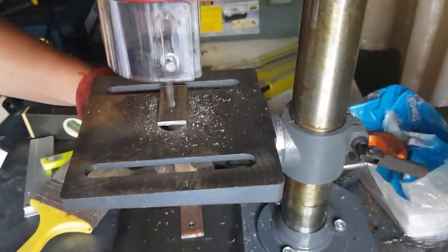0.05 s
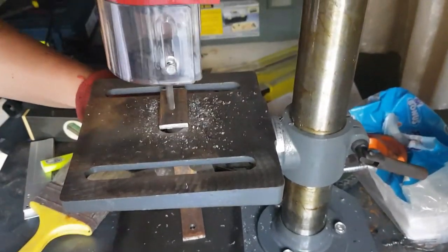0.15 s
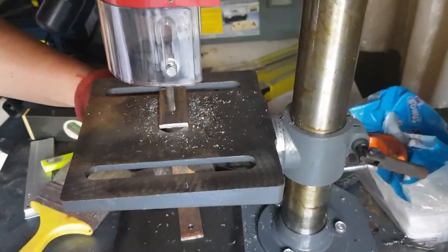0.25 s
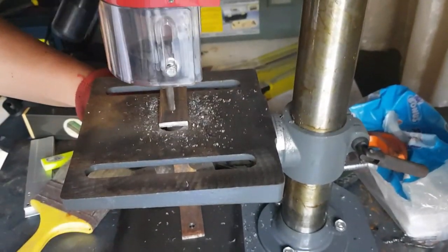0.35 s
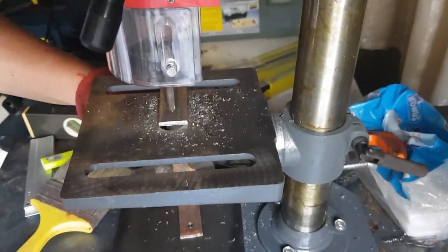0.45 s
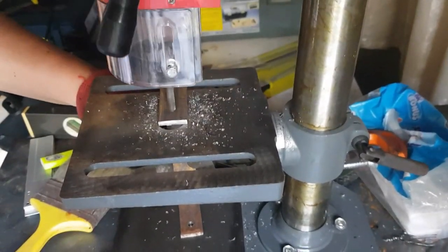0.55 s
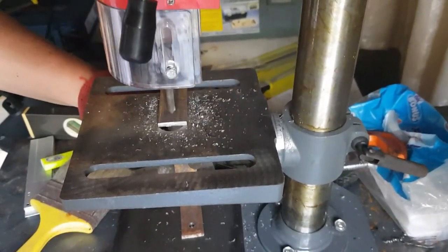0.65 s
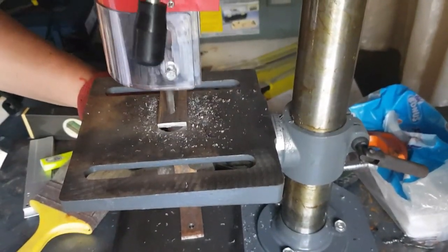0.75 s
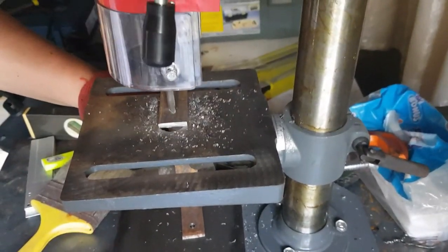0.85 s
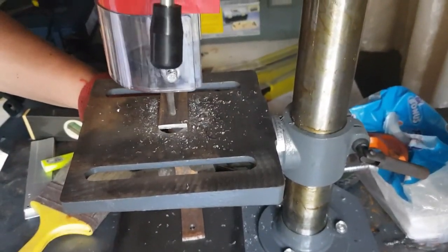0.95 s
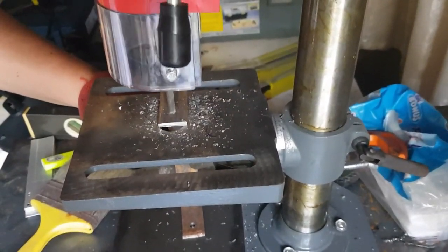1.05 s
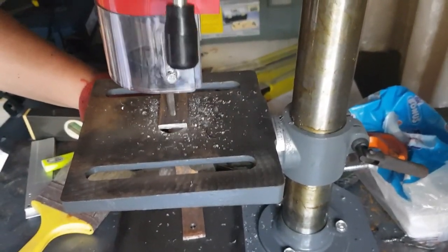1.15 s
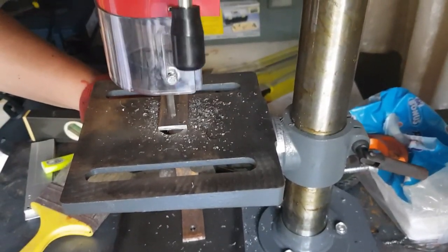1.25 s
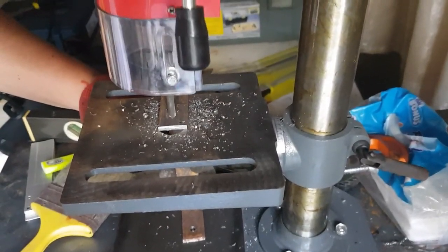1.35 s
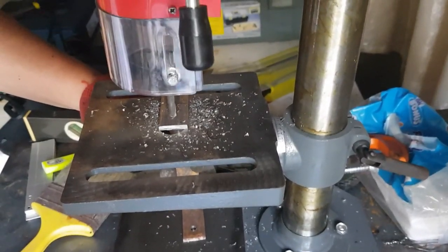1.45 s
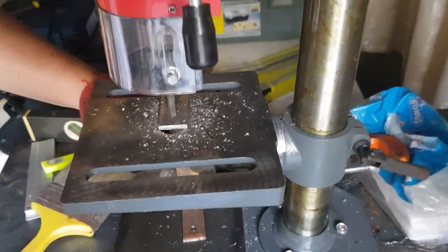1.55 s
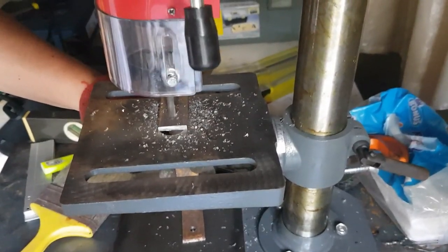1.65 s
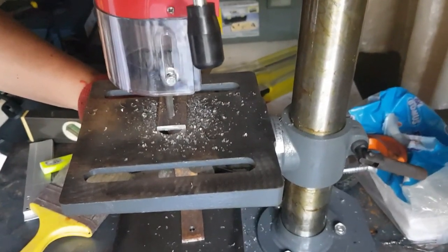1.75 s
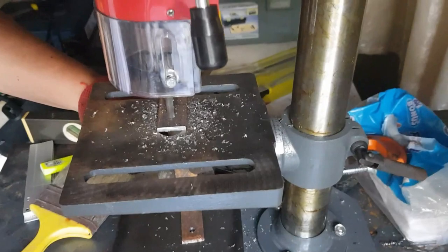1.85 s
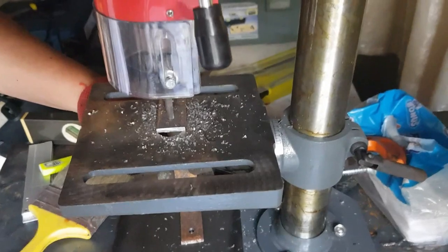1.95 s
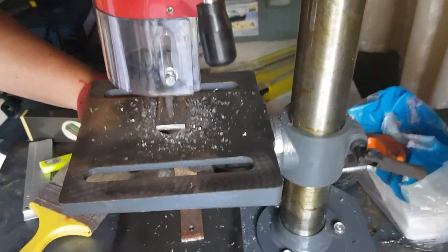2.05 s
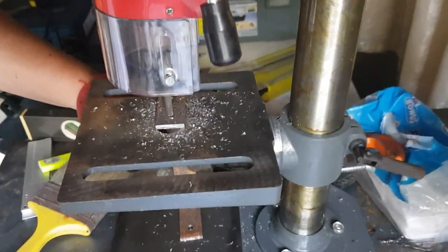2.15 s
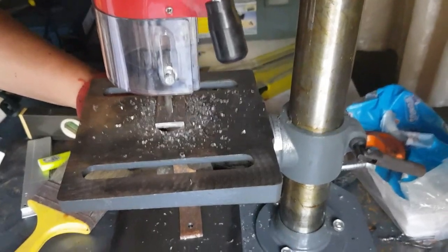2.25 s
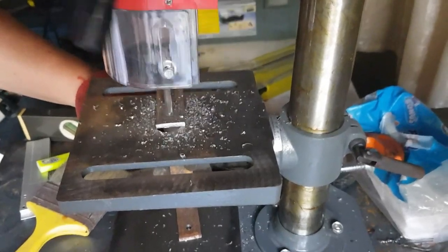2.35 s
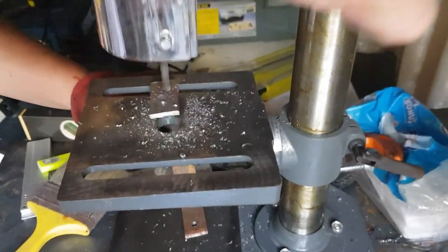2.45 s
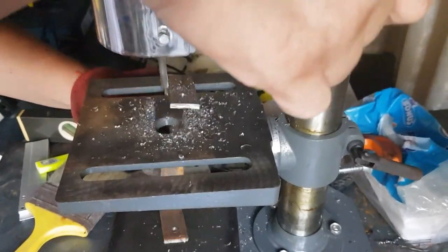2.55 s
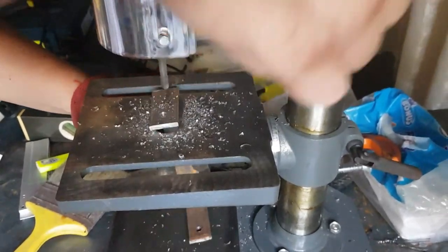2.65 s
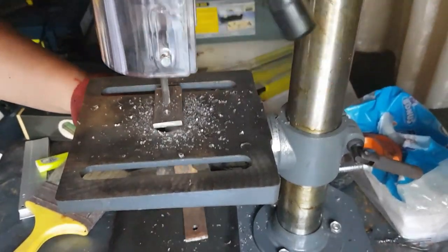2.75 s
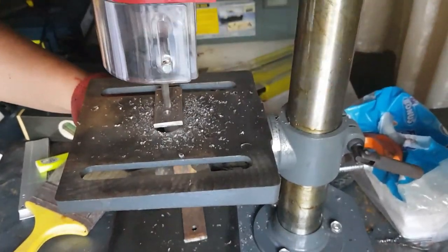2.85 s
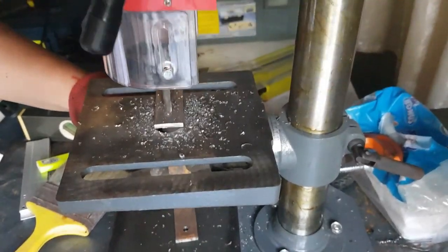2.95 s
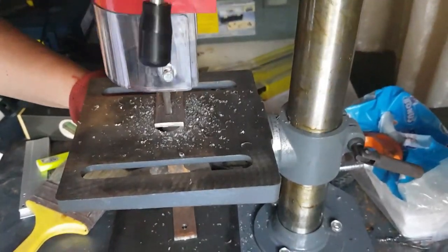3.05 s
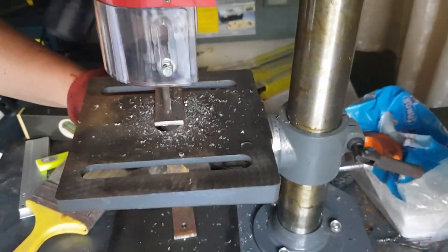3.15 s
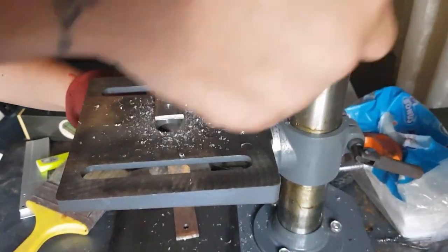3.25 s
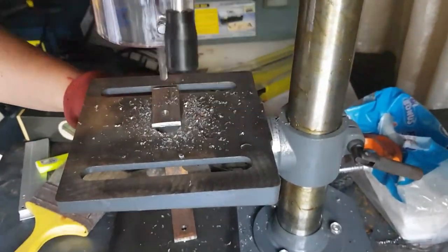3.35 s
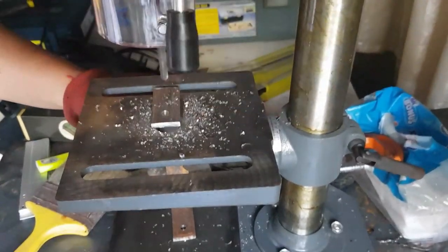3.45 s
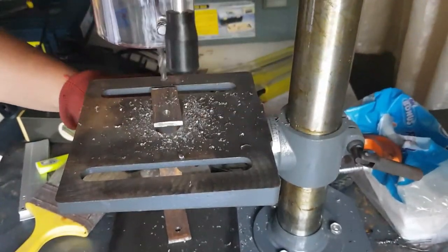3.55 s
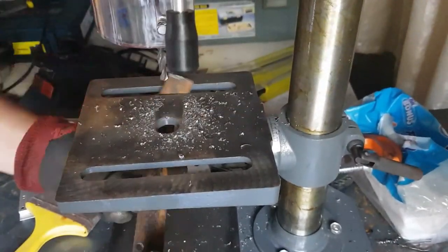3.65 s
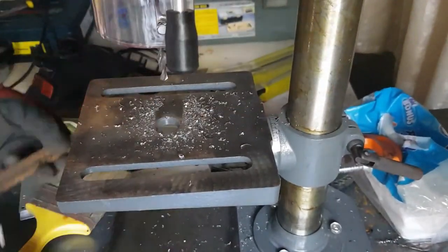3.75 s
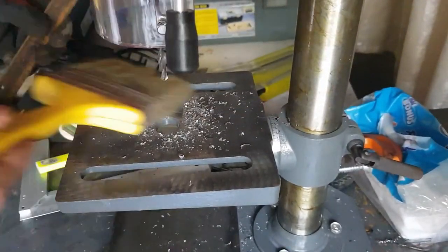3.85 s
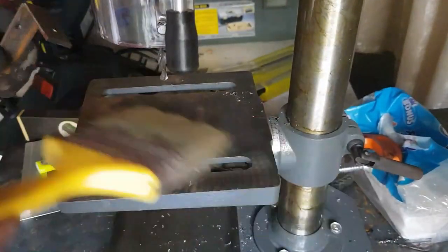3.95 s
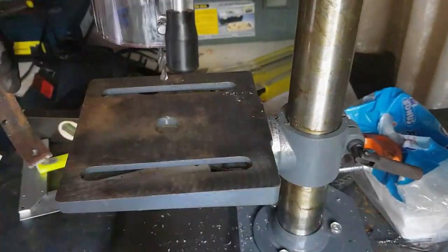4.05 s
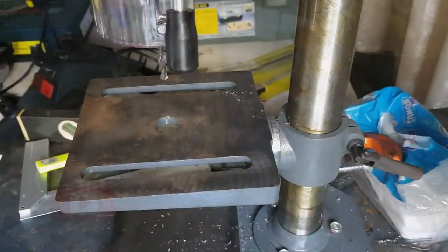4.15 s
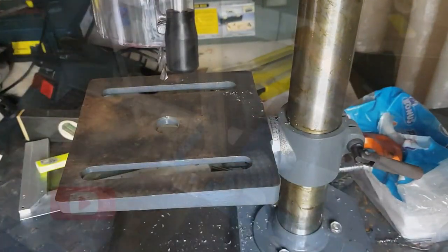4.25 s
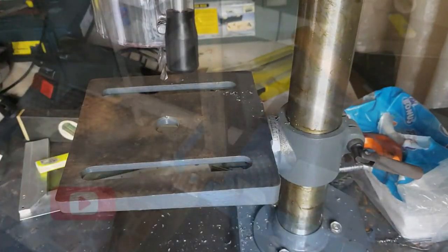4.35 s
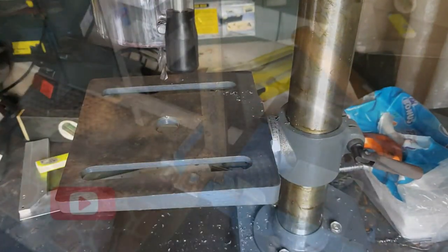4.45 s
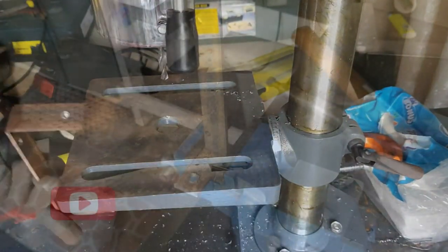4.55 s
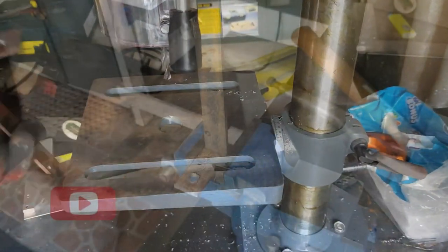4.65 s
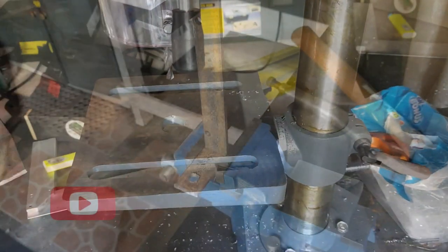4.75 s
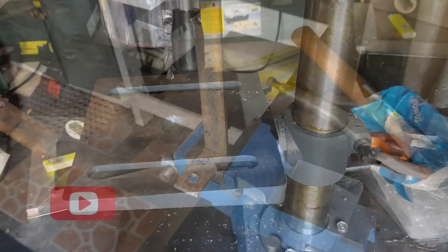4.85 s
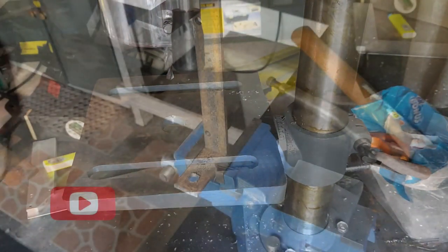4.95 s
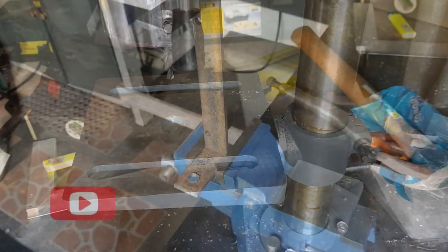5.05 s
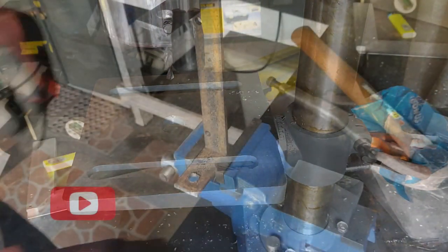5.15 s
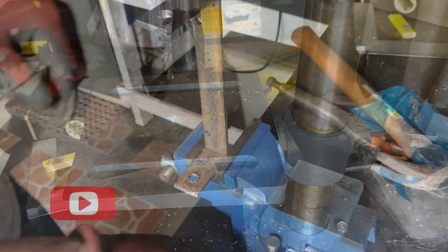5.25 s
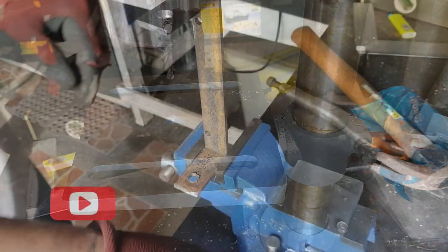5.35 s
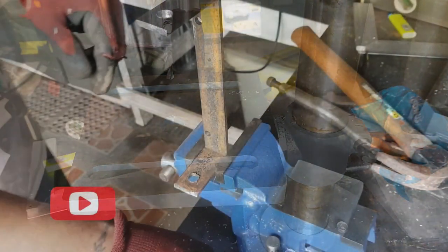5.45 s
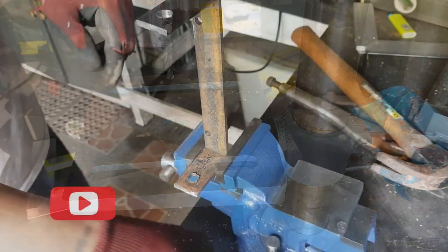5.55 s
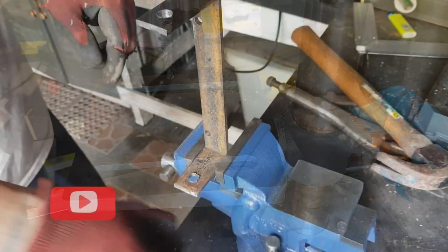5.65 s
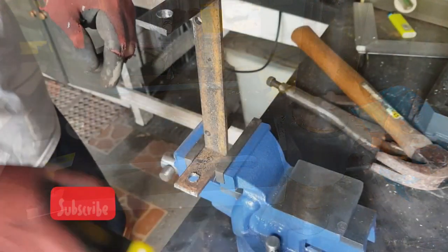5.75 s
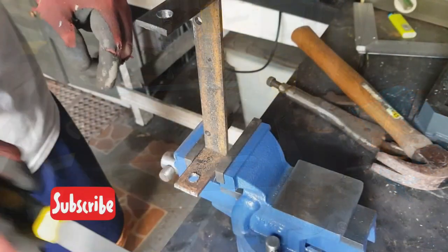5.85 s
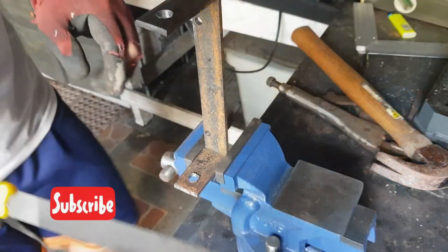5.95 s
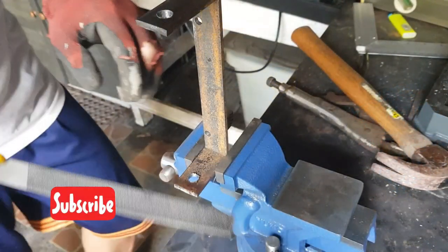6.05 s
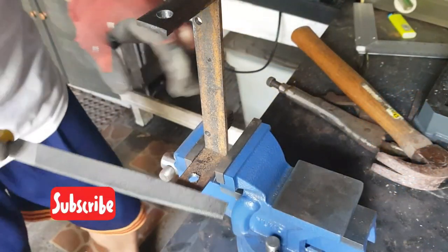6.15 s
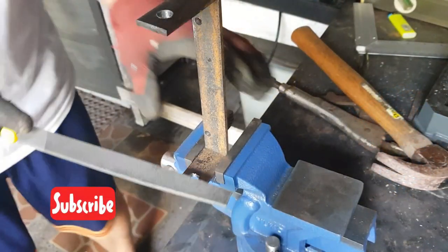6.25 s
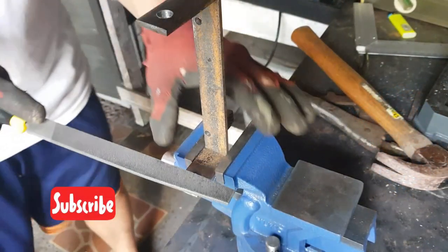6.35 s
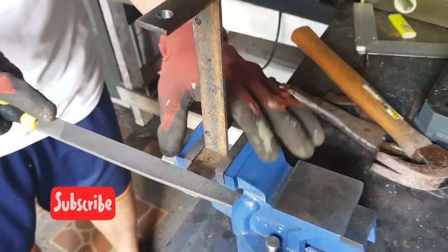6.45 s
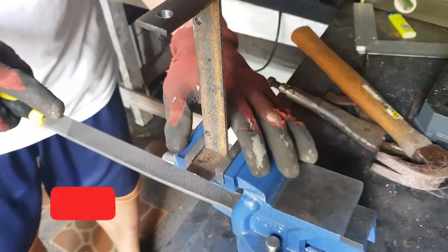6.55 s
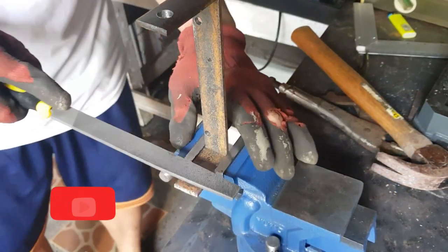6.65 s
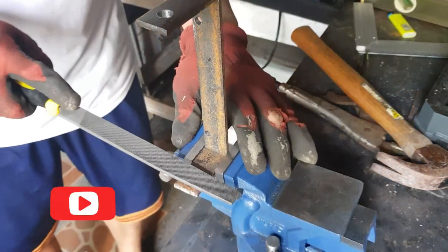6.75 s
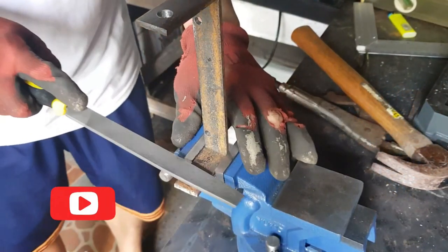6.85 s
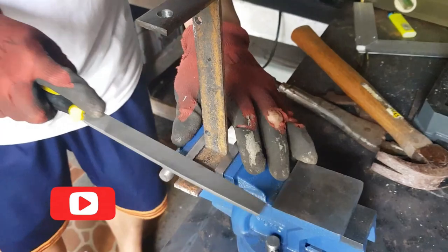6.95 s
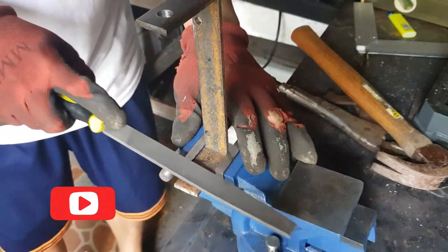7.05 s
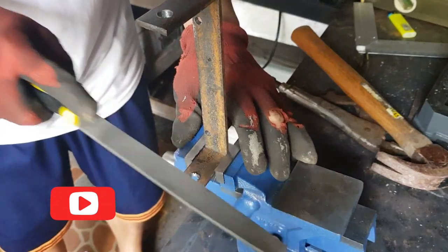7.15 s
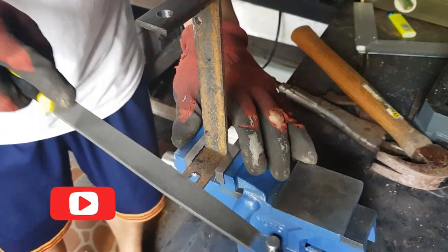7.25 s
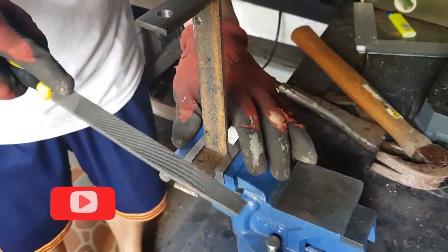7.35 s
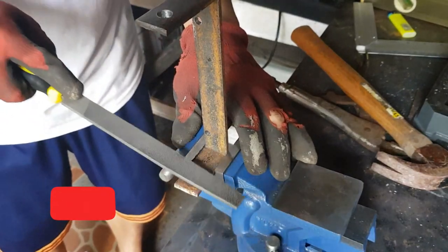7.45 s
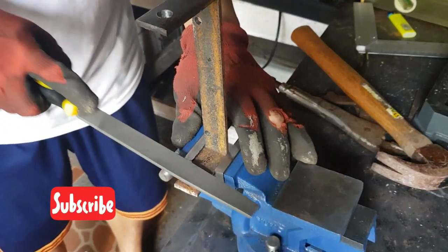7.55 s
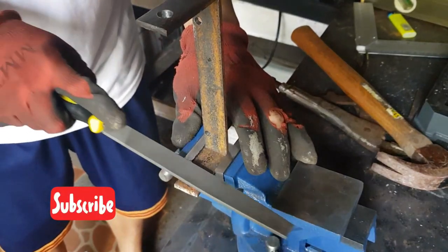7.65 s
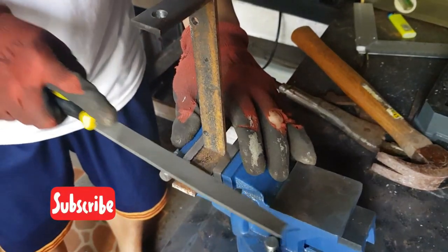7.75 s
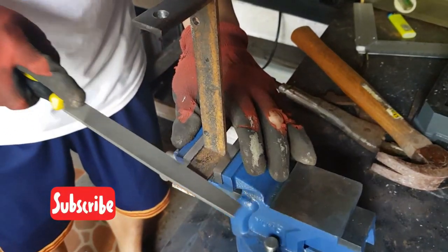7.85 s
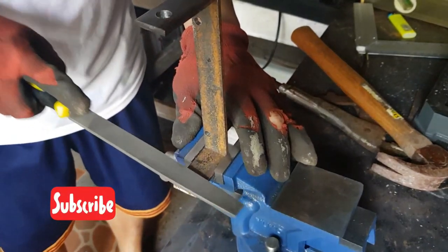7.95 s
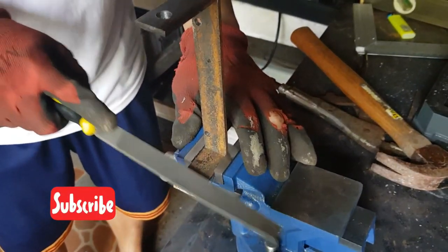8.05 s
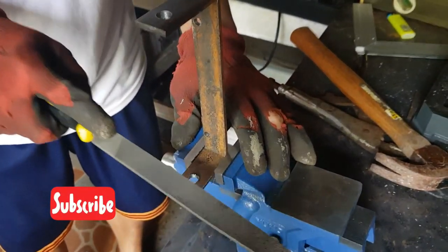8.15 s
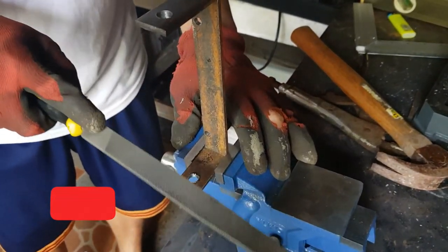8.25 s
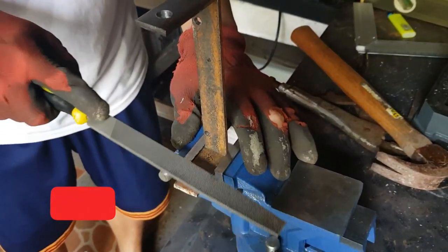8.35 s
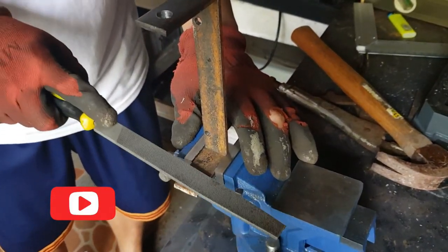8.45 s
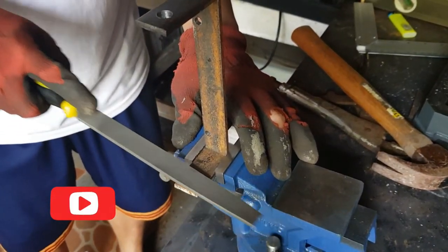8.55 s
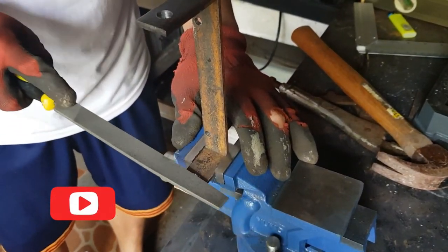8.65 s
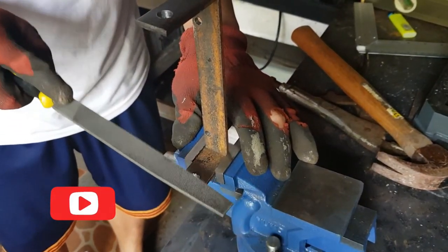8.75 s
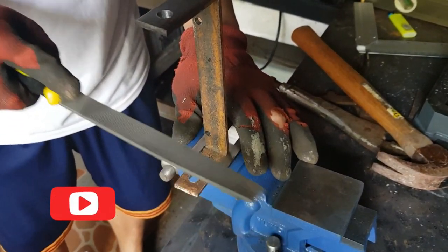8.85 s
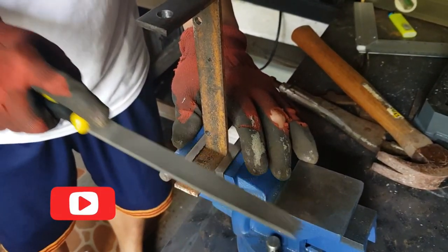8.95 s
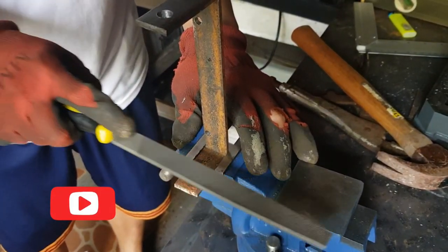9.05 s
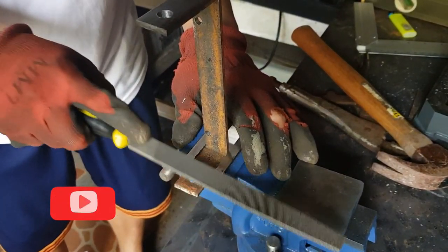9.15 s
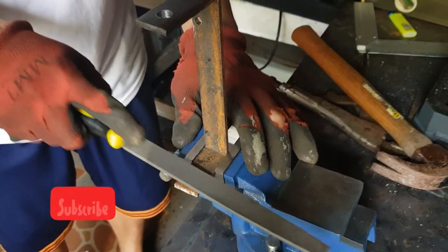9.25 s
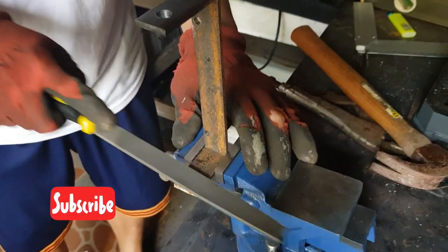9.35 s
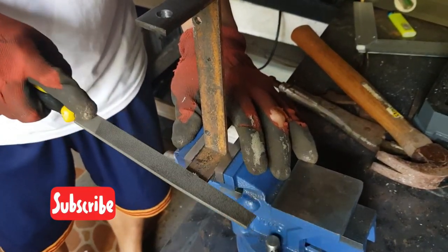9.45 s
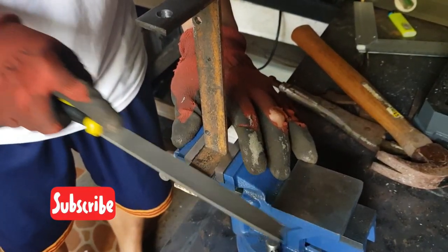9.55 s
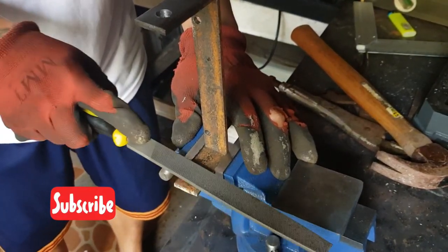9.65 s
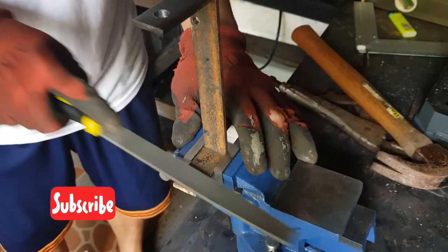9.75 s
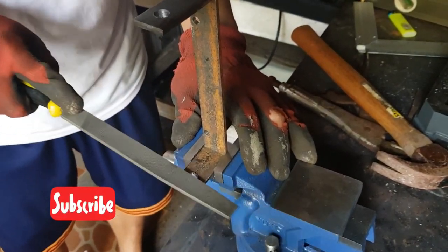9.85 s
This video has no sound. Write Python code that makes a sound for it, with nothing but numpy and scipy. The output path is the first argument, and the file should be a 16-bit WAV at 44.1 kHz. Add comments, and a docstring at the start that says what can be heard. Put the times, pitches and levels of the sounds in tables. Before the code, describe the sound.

A drill press rattles and squeals through a steel bar, then stops, followed by faint rustling and quick, ringing strokes of a metal file.

```python
"""Drilling and filing steel

A bench drill hums, rattles and squeals through a steel bar and screeches as it breaks through; then the scene
changes. The table is brushed clean and, after a blank moment, a gloved hand settles a bar in a vice. A flat
file is laid on and pushed in strokes: its teeth catch and let go, making blade, bar, vice and bench ring. All
is faster than life, so blows smear into bursts of grit. Behind are faint chirps and a low rumble."""
import sys
import numpy as np
from scipy import signal
from scipy.fft import rfft, irfft, next_fast_len
from scipy.io import wavfile
from scipy.ndimage import uniform_filter1d

SR = 44100
rng = np.random.default_rng(int(sys.argv[2]) if len(sys.argv) > 2 else 0)


def store_wav(level_fs):
    """Save 16-bit WAV to argv[1]."""
    pcm = np.round(np.clip(np.atleast_2d(level_fs), -1, 1) * 32767)
    wavfile.write(sys.argv[1], SR, pcm.T.astype(np.int16))


N = 436590
TIME = np.arange(N) / SR
SIZE = next_fast_len(N + SR // 2)
HZ = np.maximum(np.arange(SIZE // 2 + 1) * SR / SIZE, 1)   # the pitches in a spectrum

# The motor's hum ringing in its housing: time_s, level_db
HOUSING = [(0.0, -24), (0.06, -17.5), (0.7, -19), (1.17, -23), (1.18, -24.5), (2.0, -21.5), (2.03, -25),
           (2.21, -21), (2.3, -25.5), (2.51, -19.5), (2.58, -23.5), (2.67, -18.5), (3.3, -18), (3.33, -22),
           (3.45, -15.5), (3.55, -19)]
# A lower hum that groans as the bit bites: time_s, level_db
HUM = [(0.0, -45), (0.06, -34.5), (0.62, -38.5), (0.78, -33.5), (1.0, -38), (1.12, -22.5), (1.21, -20.5),
       (1.25, -31), (1.55, -39.5), (1.59, -29.5), (1.7, -37), (2.17, -29), (2.58, -41), (3.06, -33),
       (3.12, -46.5), (3.26, -32), (3.36, -52), (3.55, -43)]
def motor():
    """The motor's magnets make two trembling tones, a little louder on the right."""
    housing = amp(in_time(HOUSING)) * wavering(hz=480.5, wander_hz=2.5, flutter_db=1.5)
    hum = amp(in_time(HUM)) * wavering(hz=242.5, wander_hz=9, flutter_db=3.5)
    return housing * amp([[-2.8], [2.1]]) + hum * amp([[-1.2], [1.1]])


# The rattle's tone colour (how strong its lows and highs are): pitch_hz, level_db
RATTLE_COLOUR = [(15, -62.5), (25, -34.5), (86, -26), (160, -24), (400, -25.5), (568, -17.5), (850, -28),
                 (1000, -31), (1500, -25.5), (1810, -35), (2780, -35), (8620, -46), (12000, -43.5),
                 (15600, -43.5)]
# Notes at which the machine rings: pitch_hz, width_hz, boost_db
RATTLE_NOTES = [(81.6, 51, 4.5), (253, 23, 2.5), (475, 56, 2), (531, 37, 6.5), (840.3, 12, 15),
                (1080.7, 23, 14.5), (1305, 28, -3), (1927, 35, 10), (2840, 51, -5), (4100, 64, 4.5)]
def rattle():
    """Belt and spindle rattle, partly following the loudness of the housing. Gives a spectrum."""
    swing_db = in_time(HOUSING) - np.mean(np.array(HOUSING)[:, 1])
    force = amp(-43.5 + 0.34 * swing_db) * grit(1.6, 60)
    return sound(force, body(RATTLE_COLOUR, RATTLE_NOTES), 9500, 14940)


# How loudly the bit cuts: time_s, level_db
CUT = [(0.72, -55.5), (1.014, -35), (1.176, -31.5), (1.37, -31.5), (1.634, -27), (1.98, -27), (2.36, -29),
       (2.414, -25.5), (2.448, -48), (2.47, -61)]
# The tone colour of cutting: pitch_hz, level_db
CUT_COLOUR = [(410, -38), (700, -7.5), (847, 0), (2530, -10), (2780, -6.5), (3210, -13), (4580, -12),
              (5100, -11), (6090, -4), (12000, -23.5), (15600, -57), (22000, -120)]
# The bit's squealing notes: pitch_hz, width_hz, boost_db
BIT_NOTES = [(1222, 13, 9), (1657, 35, 11), (2117, 50, 11), (2390, 16, -2), (2740, 190, 10.5),
             (4250, 160, 10.5), (4320, 73, 1), (4620, 33, 19.5), (5540, 68, 2.5), (5937, 48, 13),
             (6140, 35, 4.5), (6700, 60, 10), (8030, 25, 8.5), (8220, 35, 13), (9540, 54, 7)]
# The tip's high notes: pitch_hz, width_hz, boost_db
TIP_NOTES = [(5000, 130, 3), (7200, 36, 4), (7500, 50, 8.5)]
# The tip squeals most as it first bites: time_s, boost_db
BITE = [(.8, 2), (.93, 12.5), (1.2, 10), (1.4, 2.5), (2.4, -3)]
def cutting():
    """The bit shears steel, which hisses and makes the bit and its tip squeal. Gives a spectrum."""
    shear = during(CUT) * amp(in_time(CUT)) * grit(1.6, 57)
    shear /= gain(body(CUT_COLOUR, BIT_NOTES), 2400, 8500)
    hiss = rfft(shear, SIZE) * amp(at_hz(CUT_COLOUR))
    squeal = rfft(shear * amp(2 + 0.94 * drift(3.5)), SIZE) * rings(CUT_COLOUR, BIT_NOTES)
    tip = rfft(shear * amp(in_time(BITE) + 2.1 * drift(19)), SIZE) * rings(CUT_COLOUR, TIP_NOTES)
    return hiss + squeal + tip


# The screech of breaking through: time_s, level_db
SCREECH = [(2.38, -59.5), (2.387, -27.5), (2.402, -23.5), (2.412, -17.5), (2.422, -25), (2.438, -42.5),
           (2.445, -69)]
# Its tone colour: pitch_hz, level_db
SCREECH_COLOUR = [(3500, -16.5), (5600, 2.5), (7500, 0), (10000, -9.5), (13500, -3.5), (15700, -4)]
# Its shrill notes: pitch_hz, width_hz, boost_db
SCREECH_NOTES = [(5700, 180, 3.5), (6290, 120, 7), (13600, 300, 11), (14570, 600, 10)]
def breakthrough():
    """The bit breaks through the bar with one bright screech. Gives a spectrum."""
    force = during(SCREECH) * amp(in_time(SCREECH)) * grit(2.5, 150)
    return sound(force, body(SCREECH_COLOUR, SCREECH_NOTES), 3500, 14000)


# Touches and strokes of the file; the last six columns are boosts on top of level_db:
# peak_s, rise_s, hold_s, level_db, lows_db, highs_db, blade_db, upright_bar_db, vice_db, bench_db
STROKES = [(6.769, -0.02, 0.0, -43, 4.5, -7, -15, 9.5, -2, 2),
           (6.82, 0.06, 0.14, -57.5, 1, 5, -12, 11, -1, 6),
           (7.067, 0.1579, 0.074, -32, 3.5, -2.5, -8, 5, 2.5, -5),
           (7.46, -0.7, 0.098, -86.5, -1.5, -13, -5, -31, -20, 1),
           (7.536, 0.13, 0, -37, -2.5, 0, 2, -8, 1, -1), (7.631, 0.2374, 0.068, -28, -7, -6, -11, 4, 10, 1),
           (7.856, .09, 0.057, -24, -5.5, -6.5, 5, -6, -3, 10),
           (8.098, 0.1, 0.026, -32.5, -0.5, -2.5, -3.5, 3.5, -3, -14),
           (8.259, .1, 0.031, -60.5, 12.5, -6, -16, -7, -11.5, -10.5),
           (8.48, 5, 0, -37, -3, -2, 3, -12, -6, 3),
           (8.596, 0.11, 0.09, -30.5, -2.5, -6.5, 4.5, 2, -0.5, -4),
           (8.797, .05, .07, -60.5, 3, -9, -12.5, -13, 0, -8),
           (9.038, 0.1, 0.0092, -75, 0, -1.5, -10, -15, -8, -1),
           (9.178, -0.4, 0.0022, -71, -15, 0, -9, -14.5, -8, -1.5),
           (9.251, .003, 0.0, -26.5, -8, -2.5, 1, -14, -3.5, 10),
           (9.339, 0.06, .06, -31, -5, -7.5, 3.5, 0, -7, -15),
           (9.455, 0.33, 0.04, -32.5, -0.5, -7, -4, -1.5, 1.5, 11.5),
           (9.618, .15, 0.055, -30, -6, -5.5, -2.5, -2, -3, -2.5),
           (9.825, 0.07, .06, -29.5, -6, -4, 5.5, -0.5, -0.5, -3)]
# The file lands on the steel: start_s, level_db, decay_s
LANDINGS = [(6.768, -29, 0.02), (7.529, -10, 0.0044), (8.476, -38, 0.029), (9.251, -25, 0.014)]
# The tone colour of the rasp: pitch_hz, level_db
RASP_COLOUR = [(53, -55), (90, -25.5), (243, 2), (444, -6.5), (551, -2), (1150, -8), (2660, -10.5),
               (3090, -15.5), (3440, -14.5), (3680, -23), (5190, -13), (15600, -24.5)]
# Notes of the clamped bar, file blade, upright bar, vice jaws and bench: pitch_hz, width_hz, boost_db
BAR_NOTES = [(246.2, 10, 9), (374, 25, -3.5), (937, 31, -14), (1303, 49, 7.5), (1766, 99, 2),
             (2205, 56, -15.5), (3910, 90, 8), (4320, 54, 2), (6350, 84, 4.5), (6950, 76, 11.5),
             (8370, 67, 4.5)]
BLADE_NOTES = [(2450, 45, 6), (2672, 42, 10), (3430, 28, 15), (5155, 45, 13)]
UPRIGHT_NOTES = [(1886, 5.5, 9), (1876, 9, 5), (1860, 60, 9), (6498, 9, 6)]
VICE_NOTES = [(501, 11, -1.5), (549.5, 33, 12.5)]
BENCH_NOTES = [(314, 31, 5)]
def filing():
    """The file's teeth scrape the bar and set the parts ringing. Gives a spectrum and the rasp's level."""
    peak_s, rise_s, hold_s, *levels = np.transpose(STROKES)
    lift_s = 0.12
    # No rasp until the file is down.
    landed_s = [max(at for at, *_ in LANDINGS if at < s + .01) - .001 for s in peak_s]
    curves = contacts(peak_s, rise_s, hold_s, lift_s, *levels, tail_db=-25.5, earliest_s=landed_s)
    rasp_db, dip_db, lows_db, highs_db, blade_db, upright_db, vice_db, bench_db = curves
    lows_db += np.clip(0.51 * dip_db, 0, 8)   # the lows fade less than the rest
    sag_db = np.clip(.4 * dip_db, 0, 15)   # lighter pressure, less ringing
    ringing = [(BLADE_NOTES[k::2], blade_db - sag_db + 3 * drift(20)) for k in range(2)]
    ringing += [(UPRIGHT_NOTES, upright_db + 3 * drift(10)),
                (VICE_NOTES, vice_db - sag_db), (BENCH_NOTES, bench_db - sag_db)]
    rasp = rubbing(rasp_db, lows_db, highs_db, RASP_COLOUR, BAR_NOTES, ringing, chatter_db=1.0)
    steel = body(RASP_COLOUR, BAR_NOTES[1:] + BLADE_NOTES + UPRIGHT_NOTES[2:3])
    return rasp + blows(LANDINGS, steel, softer_db=19), rasp_db


# Moves of brush, gloves and tools:
# peak_s, rise_s, hold_s, fall_s, level_db, lows_boost_db, highs_boost_db
MOVES = [(3.563, .01, .03, .1, -51.5, 11, -7.5), (3.64, .03, 0.0092, 0.087, -55, 12.5, -15),
         (3.719, 0.064, .015, 0.043, -48, -1, -11), (3.829, 0.031, .005, .036, -49.5, 6, 1),
         (3.937, 0.043, 0.022, .08, -57, -10, 13), (3.995, 0.048, .11, 0.066, -52.5, -28, 5),
         (4.194, 0.032, .016, 0.023, -28.5, 1, -4), (4.271, 0.045, .75, 0.096, -84.5, 4.5, 1),
         (4.37, .05, 0.064, .06, -83.5, -3, 11), (4.575, .05, .03, .1, -73, 5.5, -6),
         (4.658, .02, 0.0089, .1, -77, 9, -10), (4.854, .05, .01, 0.11, -73, -20, -20),
         (5.002, 0.029, 0.028, .04, -71.5, -19.5, 28.5), (5.185, 0.13, .03, 0.27, -73, 2.5, 3.5),
         (5.392, .06, 0.03, 0.07, -52.5, -12, -2), (5.529, .11, 0.016, 0.13, -46.5, -3.5, -1),
         (5.61, 0.039, 0.053, .11, -41.5, -4.5, -0.5), (5.807, .08, 0.027, 0.15, -51, -12, 0.5),
         (5.836, .01, .01, 0.18, -47.5, 3, -5.5), (5.92, .1, 0.042, 0.11, -61, 0, 1),
         (6.01, 0.12, 0.025, 0.19, -56, -9, 4), (6.133, .03, .015, .1, -65.5, -11, 10.5),
         (6.192, 0.055, 0.083, 0.097, -60, -4.5, 0.5), (6.326, .05, 0.039, 0.57, -74.5, 10.5, 2),
         (6.617, .06, .05, .1, -70.5, -8, -0.5), (6.721, 0.17, 0.083, 0.061, -61, -18, 5)]
# The tone colour of their rustle: pitch_hz, level_db
RUSTLE_COLOUR = [(88, -43.5), (150, -8.5), (239, 0), (389, -7), (767, -8.5), (1150, -11.5), (1430, -7),
                 (2410, -9), (2930, -13), (15600, -22.5)]
# Broad notes of the rustle, and notes of a hollow part: pitch_hz, width_hz, boost_db
RUSTLE_NOTES = [(421, 260, -2), (1460, 290, -23), (2380, 420, -16), (4000, 720, -21), (5760, 190, 2),
                (8700, 820, -8)]
HOLLOW_NOTES = [(763, 60, 10.5), (1466, 30, 10.5), (2036, 38, 8)]
# The hollow part rings as it is dragged: time_s, boost_db
DRAG = [(5.44, -38), (5.5, -1.5), (5.6, 7.5), (5.7, -4.5), (5.76, -19)]
def handling():
    """Brush, gloves and tools rustle as they rub on things. Gives a spectrum."""
    level_db, _, lows_db, highs_db = contacts(*np.transpose(MOVES), tail_db=-42)
    hollow = [(HOLLOW_NOTES, in_time(DRAG))]
    return rubbing(level_db, lows_db, highs_db, RUSTLE_COLOUR, RUSTLE_NOTES, hollow, chatter_db=1.15)


# An even tone colour: pitch_hz, level_db
FLAT = [(20, 0), (20000, 0)]
# Notes of a small steel part: pitch_hz, width_hz, level_db
CLINK_NOTES = [(1502, 36, 0), (2542, 34, -2.5), (3720, 31, -6), (5090, 32, -6.5), (5650, 40, -5),
               (6780, 38, -12.5), (7580, 29, -21.5), (8270, 43, -13), (9580, 41, -27.5)]
def clink():
    """A small steel part slides and rings. Gives a spectrum."""
    force = swell(peak_s=3.715, level_db=-45.5, half_length_s=0.03) * grit(2.5, 60)
    return sound(force, rings(FLAT, CLINK_NOTES), 1000, 12000)


# A hollow knock: start_s, level_db, decay_s
KNOCK = [(5.837, -25.5, 0.03)]
# Jolts of the bench: start_s, level_db
THUMPS = [(3.821, -43), (4.183, -32), (6.767, -37.5), (7.526, -38), (8.476, -37.5), (8.98, -44.5),
          (9.25, -27.5)]
# Notes of the knock and of the jolts: pitch_hz, width_hz, level_db
KNOCK_NOTES = [(494, 180, -5), (780, 260, 2.5), (1178, 320, -6)]
THUMP_NOTES = [(65, 40, 1.5), (149.3, 90, -8)]
def bench_bumps(thump_decay_s=0.036):
    """The bumped bench gives one hollow knock and several deep thumps. Gives a spectrum."""
    knock = blows(KNOCK, rings(FLAT, KNOCK_NOTES), softer_db=7.5)
    jolts = [(start_s, level_db, thump_decay_s) for start_s, level_db in THUMPS]
    return knock + blows(jolts, rings(FLAT, THUMP_NOTES), softer_db=4.0)


# Chirps and hums, some perhaps birds: peak_s, pitch_hz, width_hz, level_db, half_length_s
CHIRPS = [(3.787, 2720, 150, -62, 0.022), (3.89, 3130, 300, -60, 0.028), (4.26, 2100, 150, -75.5, 0.014),
          (4.582, 1754, 200, -79, 0.016), (4.735, 4100, 500, -71, .012), (4.805, 5120, 149.7, -66, 0.013),
          (4.857, 2960, 200, -63.5, .015), (4.87, 2410, 250, -64.5, 0.014), (4.897, 3230, 200, -68, 0.013),
          (4.92, 4000, 400, -72.5, .012), (4.968, 3050, 300, -60, 0.016), (5.015, 4420, 585, -26, .012),
          (5.04, 2600, 300, -61.5, .015), (5.192, 2800, 600, -73, 0.041), (9.1, 1284, 50.1, -74.5, 0.27)]
def chirps():
    """Short, mostly faint swells of noise, each around one pitch. Gives a spectrum."""
    noise, hiss = grit(1.0, 98), 0.01 * band(1700, 14000)
    return sum(sound(swell(peak_s, db, half_s) * noise, peak(hz, width_hz) ** 2 + hiss, 1000, 8000)
               for peak_s, hz, width_hz, db, half_s in CHIRPS)


# The workshop's air: time_s, level_db
AIR = [(3.6, -57.5), (4.06, -54.5), (4.216, -62.5), (4.794, -57.5), (5.05, -60.5), (5.24, -64),
       (5.41, -55.5), (6.62, -56.5), (8.24, -49), (9.26, -55.5), (9.9, -50.5)]
# Its rumbling tone colour: pitch_hz, level_db
RUMBLE_COLOUR = [(12, -36.5), (20, -7.5), (81, 3.5), (260, -14), (507, -22.5), (935, -29.5), (1140, -31),
                 (2850, -45), (4330, -38.5), (7990, -46), (15600, -50)]
def workshop_air(rasp_db):
    """The room rumbles, more so when filing shakes the floor. Gives a spectrum."""
    shake = amp(-16.5) * uniform_filter1d(amp(rasp_db), int(0.2 * SR))
    force = during(AIR) * np.hypot(amp(in_time(AIR)), shake) * grit(1.1, 15)
    return sound(force, body(RUMBLE_COLOUR, []), 25, 160)


def contacts(peak_s, rise_s, hold_s, fall_s, level_db, *boosts, tail_db, earliest_s=0):
    """Touches over time: their total level, its dip below the peak, and the boosts of the loudest."""
    t = np.arange(0, N + 20, 20) / SR
    earliest_s, peak_s, rise_s, hold_s, fall_s, level_db = (
        np.reshape(column, (-1, 1)) for column in (earliest_s, peak_s, rise_s, hold_s, fall_s, level_db))
    # A rise or a fall spans 30 dB; the rise starts steep and rounds off.
    rise_left = np.minimum(np.maximum(peak_s - t, 0) / np.maximum(rise_s, .002), 9)
    rise = (t >= earliest_s) * amp(level_db - 30 * rise_left ** 1.23)
    after_s = np.maximum(t - peak_s - hold_s, 0)
    fall = amp(-30 * after_s / fall_s)
    tail = amp(tail_db - 148.5 * after_s)   # the room rings on
    power = rise ** 2 * (fall ** 2 + tail ** 2) + 1e-30
    total_db = 10 * np.log10(power.sum(axis=0))
    share = power / power.sum(axis=0)
    dip_db = level_db[:, 0] @ share - total_db
    return [np.interp(TIME, t, curve) for curve in (total_db, dip_db, *(np.array(boosts) @ share))]


def rubbing(level_db, lows_db, highs_db, colour, notes, ringing, chatter_db):
    """Grit under a sliding touch: pressure shifts the lows and highs while notes come and go."""
    force = amp(level_db) * grit(1.0, 38) * amp(chatter_db * drift(163))   # catching and letting go
    groups = [(notes[k::3], 3 * drift(8.6)) for k in range(3)] + ringing
    out = 0
    for db, edges_hz in ((lows_db, (1, 900)), (0, (900, 3700)), (highs_db, (3700, SR))):
        share = np.sqrt(band(*edges_hz))
        share /= gain(share * body(colour, notes), 160, 14000)
        out += rfft(force * amp(db), SIZE) * amp(at_hz(colour)) * share
        for group, boost_db in groups:
            out += rfft(force * amp(db + boost_db), SIZE) * rings(colour, group) * share
    return out


def blows(events, response, softer_db):
    """Sudden bursts of grit that die fast and leave the struck thing ringing."""
    envelope = 0
    for start_s, level_db, decay_s in events:
        since_s = np.maximum(TIME - start_s, 0)
        crack = 0.59 * np.exp(-since_s / .004)   # the first hard contact
        envelope += amp(level_db - softer_db) * (TIME >= start_s) * (crack + np.exp(-since_s / decay_s))
    return sound(envelope * grit(1.1, 200), response, 30, 9000)


def swell(peak_s, level_db, half_length_s):
    """A short, smooth rise and fall."""
    return amp(level_db) * np.exp(-((TIME - peak_s) / half_length_s) ** 2)


def wavering(hz, wander_hz, flutter_db):
    """A tone whose pitch and strength tremble."""
    phase = 2 * np.pi * np.cumsum(hz + wander_hz * drift(14)) / SR
    return np.sqrt(2) * np.sin(phase) * amp(flutter_db * drift(19))


def grit(flicker_db, rate_hz):
    """Two streams of noise, like countless tiny contacts, that flicker together."""
    return rng.standard_normal((2, N)) * amp(flicker_db * drift(rate_hz))


def drift(rate_hz):
    """A smooth random wobble, typically about 1 in size."""
    pole = np.exp(-80 * np.pi * rate_hz / SR)
    slow = signal.lfilter([1], [1, -2 * pole, pole * pole], rng.standard_normal(N // 40 + 2002))[2000:]
    return np.interp(np.arange(N) / 40, np.arange(len(slow)), slow / slow.std())


def sound(force, response, low_hz, high_hz):
    """The spectrum of a shaken thing; the force sets its level between low_hz and high_hz."""
    return rfft(force, SIZE) * response / gain(response, low_hz, high_hz)


def body(colour, notes):
    """How a thing answers shaking: a broad tone colour plus its ringing notes."""
    return amp(at_hz(colour)) + rings(colour, notes)


def rings(colour, notes):
    """Ringing notes alone, each boosted from the tone colour."""
    peaks = sum(amp(db) * peak(hz, width_hz) * (-1) ** k for k, (hz, width_hz, db) in enumerate(notes))
    return amp(at_hz(colour)) * peaks


def peak(hz, width_hz):
    """One ringing note: the narrower it is, the longer it rings."""
    return 1 / (1 + 1j * (HZ - hz) / (max(width_hz, 1) / 2))


def band(low_hz, high_hz):
    """The share of power kept at each pitch by a soft-edged band."""
    return 1 / (1 + (HZ / high_hz) ** 8) - 1 / (1 + (HZ / low_hz) ** 8)


def gain(response, low_hz, high_hz):
    """How strongly plain noise comes through within a band."""
    return np.sqrt(np.sum(abs(response) ** 2 * band(low_hz, high_hz)) / len(HZ))


def amp(db):
    """Turn decibels into a multiplier."""
    return 10 ** (np.asarray(db) / 20)


def in_time(table):
    """Join a table's points into a value for every sample."""
    return np.interp(TIME, *np.transpose(table))


def during(table):
    """One from a table's first time to its last, zero outside."""
    return uniform_filter1d(1. * (TIME >= table[0][0]) * (TIME <= table[-1][0] + .008), size=200)


def at_hz(table):
    """Join a table's points into a value for every pitch."""
    pitch_hz, values = np.transpose(table)
    return np.interp(np.log(HZ), np.log(pitch_hz), values)


# Near reflections: delay_s
ECHOES = [.0004, .0011, .0023, .0039]
def stereo(spectra, likeness, lean):
    """Turn two spectra into sound: one is alike on both sides, the other opposite and mixed with echoes."""
    alike, tilt = np.clip(at_hz(likeness), -.6, 1), amp(at_hz(lean) / 2)
    echoes = sum(np.exp(-2j * np.pi * HZ * s) * (-1) ** k for k, s in enumerate(ECHOES)) / 2
    echo_share = .42
    other = np.sqrt(echo_share) * spectra[0] * echoes + np.sqrt(1 - echo_share) * spectra[1]
    shared = np.sqrt((1 + alike) / 2) * spectra[0]
    opposed = np.sqrt((1 - alike) / 2) * other
    return irfft([(shared + opposed) * tilt, (shared - opposed) / tilt], SIZE)[:, :N]


# How alike left and right are, for drill and bench work: pitch_hz, likeness (1 is the same)
DRILL_LIKENESS = [(60, 0.4), (150, 0.99), (380, 1), (950, 0.074), (2380, 0.16), (5980, 0.2), (15000, -0.17)]
BENCH_LIKENESS = [(60, 0.83), (180, 0.93), (550, 0.23), (1650, -0.12), (4970, -0.27), (15000, -0.15)]
# Which side is louder: pitch_hz, left_minus_right_db
DRILL_LEAN = [(60, -5.5), (150, -0.5), (380, -9.5), (950, 2.5), (2380, -0.5), (5980, -2.5), (15000, -1)]
BENCH_LEAN = [(60, -3.5), (180, -1), (550, -3), (1650, 1.5), (4970, -3), (15000, 1.5)]
def scene():
    """The drill runs, then the scene changes abruptly to the bench work."""
    change_s, fade_db_per_s = 3.553, 1196.5
    running = amp(-fade_db_per_s * np.clip(TIME - change_s, 0, 1))
    drill = motor() + stereo(rattle() + cutting() + breakthrough(), DRILL_LIKENESS, DRILL_LEAN)
    strokes, rasp_db = filing()
    bench_work = strokes + handling() + clink() + bench_bumps() + chirps() + workshop_air(rasp_db)
    return running * drill + stereo(bench_work, BENCH_LIKENESS, BENCH_LEAN)


def record(dry):
    """The sound drops out for a moment, and the very highest treble is cut away."""
    blank_start_s, blank_end_s, cutoff_hz = 5.057, 5.128, 15720
    audible = uniform_filter1d(1. * ((TIME < blank_start_s) | (TIME > blank_end_s)), size=60)
    return signal.sosfilt(signal.ellip(18, .5, 95, cutoff_hz, fs=SR, output="sos"), dry * audible)


dry = scene()
out = record(dry)
store_wav(out)
```